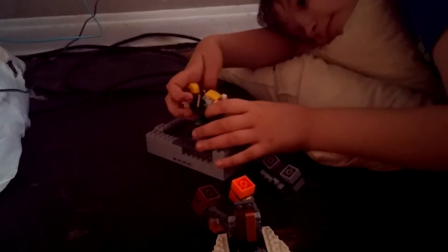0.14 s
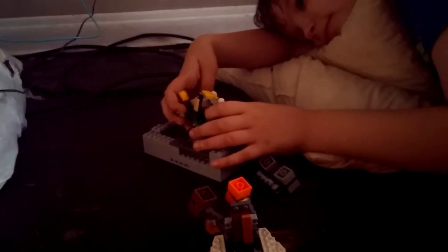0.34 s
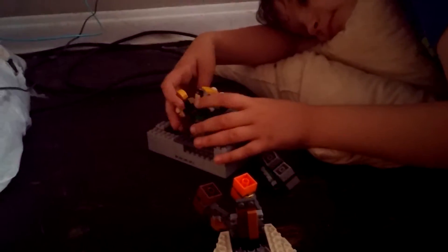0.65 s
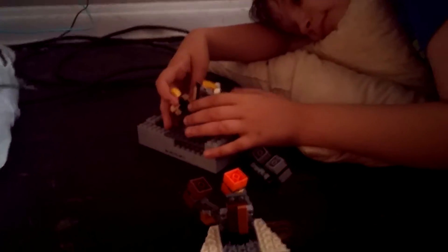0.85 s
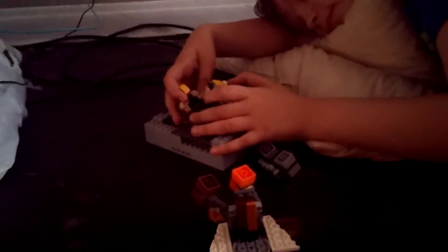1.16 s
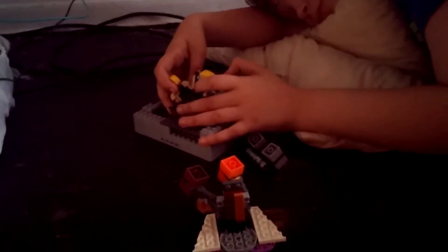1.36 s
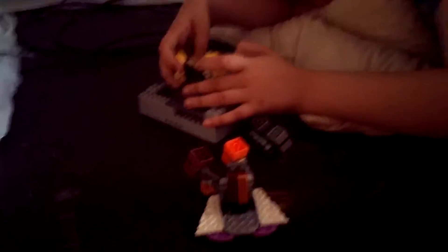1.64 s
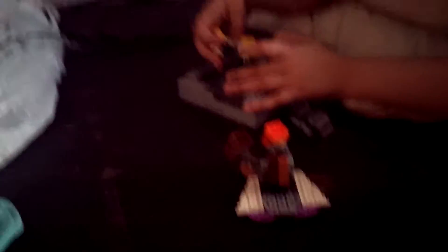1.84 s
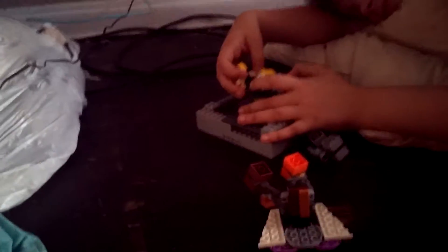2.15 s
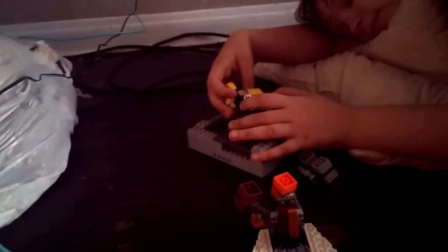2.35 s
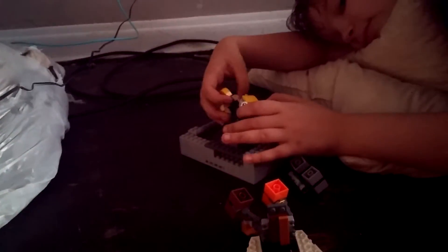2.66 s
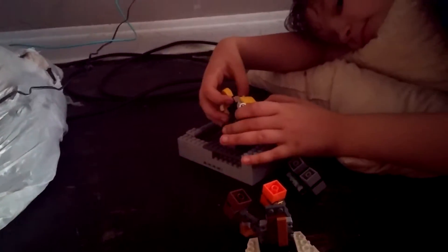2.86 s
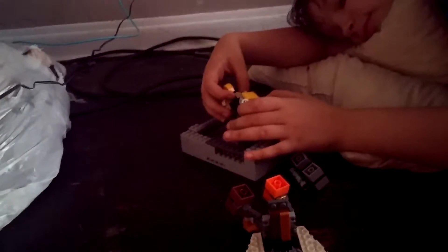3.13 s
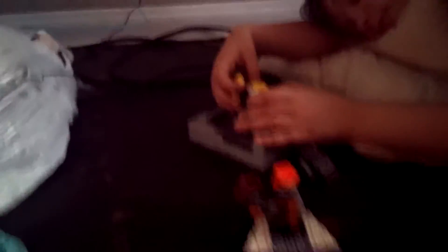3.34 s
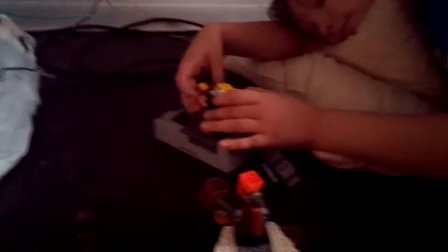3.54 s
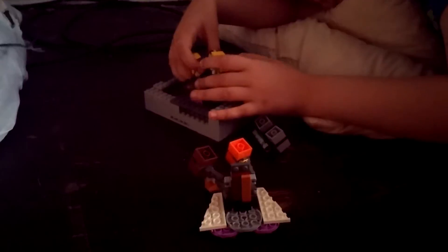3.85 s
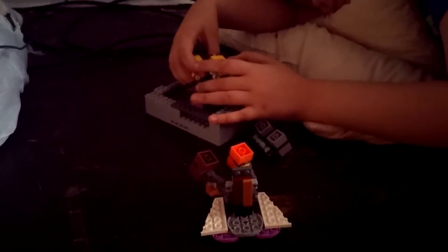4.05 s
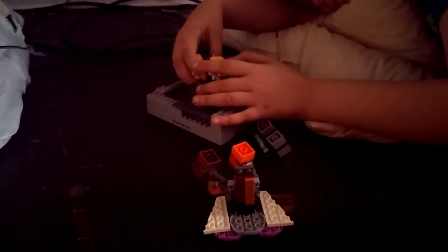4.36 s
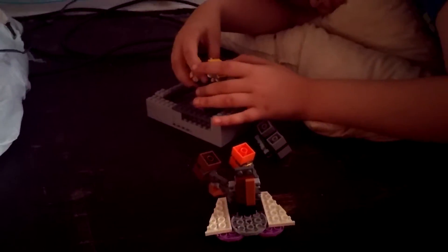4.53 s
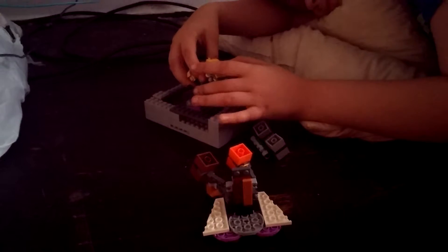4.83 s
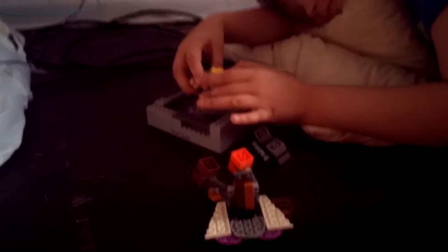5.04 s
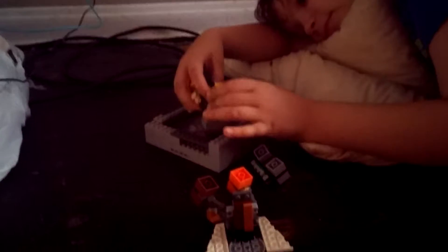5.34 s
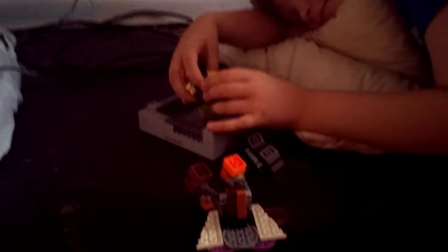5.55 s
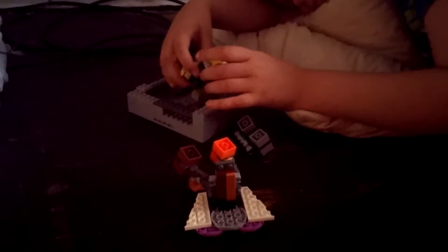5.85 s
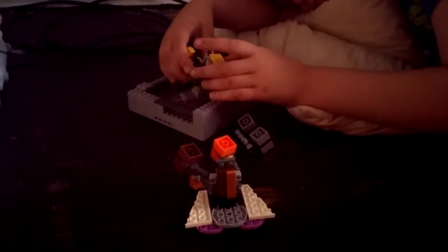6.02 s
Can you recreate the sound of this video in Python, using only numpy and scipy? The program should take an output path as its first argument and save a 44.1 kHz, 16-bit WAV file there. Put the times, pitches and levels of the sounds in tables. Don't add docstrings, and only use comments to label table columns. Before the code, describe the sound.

Small plastic bricks click, snap and clack in irregular bursts close by, with loud finger knocks on the microphone over a very faint low hum.

```python
import sys
import numpy as np
from scipy import signal
from scipy.fft import rfft, irfft, next_fast_len
from scipy.io import wavfile
from scipy.ndimage import uniform_filter1d, map_coordinates

SR = 44100
rng = np.random.default_rng(int(sys.argv[2]) if len(sys.argv) > 2 else 0)


def digitize_waveform(pressure):
    field = np.atleast_2d(pressure).T
    bounded = np.clip(field, -1, 1)
    quanta = np.round(bounded * 32767).astype(np.int16)
    wavfile.write(sys.argv[1], SR, quanta)


def invert_db(level):
    return 10 ** (np.asarray(level, dtype=float) / 20)


N = 272979

# pitch_hz, level_db, unsteadiness_db
HUM_LINES = [(59, -61.5, 0.5), (82.2, -53, 0), (113, -72.5, 2), (169.7, -70.5, 3), (226, -82.5, 1.5),
             (284, -77, 2), (333, -75.5, 0.5), (534, -92.5, 1)]
# freq_hz, density_db
DRONE_SPECTRUM = [(12, -45.5), (30, -6), (90, -3), (340, -13), (412, -25), (800, -27.5), (2000, -57.5),
                  (3000, -86)]
# time_s, level_db
DRONE_SWELL = [(0.0, -69.5), (0.58, -74.5), (1.29, -70.5), (1.57, -75.5), (2.33, -67.5), (3.26, -81),
               (3.53, -71), (3.98, -67), (4.14, -68), (4.86, -76.5), (5.84, -69), (6.19, -71)]
# freq_hz, likeness_0_1
DRONE_LIKENESS = [(60, 1), (290, 0.83), (640, 1), (1400, 0.64), (3000, .05)]
# freq_hz, density_db
AIR_SPECTRA = [
    [(4500, -21.5), (6000, -4), (8000, 12.5), (9200, 13.5), (10500, -4), (12000, 2.5), (15500, -0.5),
     (15900, -40)],
    [(4500, -23.5), (6000, -9), (8000, -0.5), (9800, 9), (11200, 2.5), (12500, -3), (15500, -5.5),
     (15900, -40.5)],
]
# freq_hz, density_db
MURK_SPECTRUM = [(600, -8), (1200, -2), (2000, -0.5), (3500, -3), (5500, -8.5), (7500, -23)]
# freq_hz, density_db
RUSTLE_SPECTRUM = [(250, -29.5), (450, -6.5), (800, 0.5), (1200, -7), (1800, -31.5)]
# time_s, whistle_hz
PORT_WHISTLE = [(0, 10190), (.88, 10200), (.99, 9960), (1.1, 10200), (1.8, 10250), (2.15, 10210),
                (2.4, 9700), (2.65, 9280), (2.95, 9480), (3.2, 9380), (3.5, 9550), (3.8, 9880),
                (4.1, 10250), (4.8, 10290), (5.15, 10250), (5.45, 10080), (5.75, 10230), (6.19, 10270)]
# time_s, level_db
IDLE_LEAK = [(0, -56), (.4, -60.5), (.6, -73), (1.1, -62), (1.85, -70.5), (2.04, -90), (2.2, -67.5),
             (2.35, -64), (2.42, -73.5), (2.8, -111), (3.2, -81), (3.42, -100), (4.1, -74.5), (4.5, -107),
             (4.9, -88.5), (5.07, -70), (5.68, -68.5), (6.19, -62)]
# time_s, level_db, squeak_0_1
RUB_STROKES = [
    [(3.485, -83, 0.93), (3.51, -48, 0.93), (3.525, -34, 0.84), (3.545, -62, 0.92), (3.58, -69, 0.6)],
    [(3.74, -56.5, 0.94), (3.80, -51.5, 0.75), (3.86, -59, 0.7), (3.90, -44, 0.58), (3.945, -32.5, 0.04),
     (4.005, -44.5, 0.2), (4.06, -43, 0), (4.12, -60.5, 0.1), (4.18, -53, 0)],
    [(4.545, -73, 1), (4.57, -42, 0.36), (4.605, -28, 0.11), (4.625, -36.5, 0.11), (4.65, -47, 0.26),
     (4.70, -52.5, 0.74), (4.75, -74.5, 0.7)],
]
# freq_hz, density_db
SKIN_SPECTRUM = [(130, -0.5), (300, -16.5), (900, -12), (2500, -5.5), (4000, -11), (9500, -14),
                 (13000, -20), (15600, -24), (15900, -72)]
# freq_hz, density_db
SQUEAK_SPECTRUM = [(4000, -70), (7000, -5), (9500, 2.5), (12000, -8), (15500, -18), (15900, -71)]
# time_s, level_db
PALM_ROLL = [(3.893, -71), (3.918, -38), (3.951, -40.5), (3.992, -53), (4.041, -49.5), (4.08, -77)]
# freq_hz, density_db
PALM_SPECTRUM = [(60, 4.5), (200, -1), (480, -3), (1000, -15), (2000, -26)]
# start_s, level_db
NAIL_TICKS = [(0.4418, -34), (1.0761, -28), (2.3045, -57.5), (3.8333, -33.5), (3.9435, -23.5), (4.05, -25),
              (4.417, -52.5), (4.1634, -21), (4.4378, -47), (4.4509, -40), (4.6, -19.5), (4.6065, -21),
              (4.62, -26), (4.639, -16.5), (4.642, -24), (4.668, -22.5), (4.6987, -38.5), (5.3548, -35)]
# freq_hz, density_db
NAIL_SPECTRUM = [(2500, -36), (5000, -18.5), (8000, 4), (12000, -2.5), (15900, -24)]
# start_s, level_db, pitch_hz, t60_s, rattle_db
CASE_BUMPS = [
    (1.617, -36.5, 96, 0.03, -56),
    (1.8623, -23.5, 124, 0.039, -13),
    (1.93, -28.5, 117, 0.021, -24.5),
    (2.299, -27.5, 115, 0.034, -16),
    (3.519, -18.5, 138, 0.016, -25),
    (3.812, -33.5, 148, 0.042, -13.5),
    (3.891, 1, 200, 0.0078, -4),
    (4.049, -15.5, 247, 0.018, 8),
    (5.71, -46, 105, 0.062, -46),
]
# centre_s, half_length_s, pitch_hz, level_db
CASE_CREAKS = [(3.52, 0.0042, 1086, -36.5), (3.532, 0.0041, 1020, -39), (3.5265, 0.0039, 2110, -31),
               (3.531, 0.0038, 2430, -40), (3.517, 0.0039, 2330, -52), (3.8, 0.0054, 1900, -48),
               (3.53, 0.0053, 588, -56), (3.8918, 0.0017, 600, -19), (3.912, .005, 550, -39),
               (3.92, .006, 430, -34.5), (3.929, .005, 530, -33.5), (3.934, .004, 700, -36.5),
               (4.0505, .002, 2500, -26.5), (3.813, 0.0036, 2200, -50.5)]
# centre_s, half_length_s, pitch_hz
BRIEF_TONES = [(1.867, .0035, 1090), (1.868, .002, 1900), (1.867, .002, 3100), (5.021, .007, 1380),
               (5.04, .008, 1400), (2.69, .015, 255), (5.109, .006, 270), (1.45, .012, 760),
               (3.526, .003, 2350), (5.522, .008, 1400), (5.572, .009, 1420), (3.783, .005, 1350),
               (2.302, .004, 1250), (2.303, .004, 2900)]
BRIEF_TONE_DB = [-39.5, -54, -52, -58, -68, -55.5, -49, -59, -45, -60, -64, -57, -55, -55]
# pitch_hz, level_db, t60_s
BRICK_MODES = [(1370, -19.5, 0.042), (1495, 5, 0.018), (1840, -1.5, 0.048), (2030, -0.5, 0.02),
               (2680, 4.5, 0.017), (2940, -4.5, 0.015), (4620, 4, .012)]
# freq_hz, density_db
SNAP_SPECTRUM = [(2500, -42), (4500, -5.5), (6000, 1), (8000, 7), (10500, -6.5), (13000, -12.5),
                 (15600, -28), (16100, -42.5)]
# freq_hz, density_db
CLACK_SPECTRUM = [(300, -50), (800, 6), (1200, -16.5), (1450, -2.5), (2200, -3.5), (3300, -4), (5000, -6.5),
                  (7500, -26.5)]
# share_of_pitch, density_db
CAVITY_SPECTRUM = [(0.701, -44.5), (0.879, -26), (0.96, 2.5), (1.04, -3), (1.128, -6.5), (1.398, -40.5)]
# start_s, snap_db, body_db, pitch_hz
BRICK_HITS = [(0.0008, -16.5, -30.5, 1840), (0.0148, -26, -27, 1660), (0.0168, -6.5, -23.5, 4700),
              (0.0424, -26, -31.5, 2600), (0.0608, -21.5, -27.5, 2000), (0.149, -26.5, -34.5, 1610),
              (0.19, -17, -26.5, 2645), (0.3458, -24.5, -30.5, 1905), (0.9248, -21.5, -29.5, 2570),
              (0.936, -22, -32, 4700), (0.9405, -29.5, -32.5, 2300), (0.9695, -38, -40, 1800),
              (1.1833, -13, -28, 1870), (1.1901, -14.5, -28.5, 1410), (1.2027, -28.5, -30, 1460),
              (1.3317, -24.5, -32, 1420), (1.3504, -8, -24.5, 2900), (1.3535, -19.5, -26.5, 3950),
              (1.4292, -23.5, -34, 3270), (1.4374, -40, -33, 3044), (1.9328, -32, -31.5, 1600),
              (1.9384, -22, -31, 3600), (2.1017, -11, -28.5, 3490), (2.1053, -16.5, -28.5, 2700),
              (2.1419, -15.5, -21, 2600), (2.4458, -24.5, -26.5, 4680), (2.4547, -10, -27, 3190),
              (2.4595, -20, -27, 2650), (2.4658, -11, -17.5, 3320), (4.0368, -25.5, -35, 3113),
              (5.0948, -24.5, -39, 1936), (5.098, -16.5, -29, 2030), (5.4244, -20.5, -31, 1710),
              (5.4479, -29.5, -34, 2270), (5.7326, -19, -33, 1580), (5.7475, -11, -25.5, 2610),
              (5.8635, -33.5, -33, 1970),
              (0.8577, -35, -56, 1860), (1.1194, -45.5, -53.5, 2720), (1.3235, -33.5, -43, 1440),
              (1.8183, -56, -67.5, 1550), (0.3536, -27.5, -42, 1840), (0.4433, -32.5, -41.5, 2820),
              (0.7459, -46, -45.5, 1940), (0.7511, -44, -62.5, 2000), (0.8738, -30, -39.5, 2020),
              (0.8892, -28.5, -41, 2000), (0.9029, -32.5, -34.5, 2030), (1.0659, -36, -49.5, 2000),
              (1.0993, -46.5, -49, 1840), (4.047, -33.5, -44.5, 2330), (1.2376, -29, -35.5, 2880),
              (1.898, -40.5, -44, 2480), (1.908, -37.5, -42, 3250), (2.07, -35, -96, 2570),
              (2.0833, -26, -41.5, 2640), (2.0942, -30.5, -33.5, 2820), (2.3003, -42, -42.5, 1760),
              (2.6733, -51, -43.5, 2780), (2.6877, -43.5, -47.5, 2600), (2.9217, -36, -48.5, 2730),
              (3.7783, -32.5, -49, 2680), (4.0105, -30, -37.5, 3270), (4.0272, -37, -33, 3060),
              (4.132, -30, -39.5, 2530), (4.2832, -45, -49, 2700), (4.3015, -39, -41, 2670),
              (4.31, -51.5, -54.5, 4400), (4.617, -28.5, -42.5, 1610), (5.4338, -56, -44.5, 1994),
              (5.5946, -27, -42.5, 1840), (5.7104, -29, -35.5, 1630), (6.0227, -27.5, -41.5, 1514)]
# start_s, snap_db, pitch_hz
EDGE_GRAZES = [(0.1055, -36.5, 1910), (0.1806, -29, 2600), (0.264, -26, 1900), (0.4391, -42, 2790),
               (0.8349, -39, 4620), (0.865, -32, 1970), (1.0396, -34, 2610), (1.5411, -45, 3040),
               (1.5539, -45, 3020), (1.7894, -49, 3360), (1.863, -32, 1095), (1.9104, -30, 3230),
               (2.0757, -29, 2350), (2.866, -41, 1500), (2.8966, -41.5, 1260), (3.085, -49.5, 1290),
               (3.5222, -47, 2300), (3.6833, -52.5, 1264), (3.7452, -48, 2470), (3.76, -47, 2610),
               (3.788, -35.5, 2580), (4.4346, -51, 1397), (5.015, -47, 1366), (5.0752, -50, 1460),
               (5.2875, -40, 1370), (5.3322, -36.5, 4720), (5.5191, -35, 1450), (5.5801, -41.5, 1380),
               (5.8575, -49, 1900), (5.917, -33, 3420), (5.9592, -38.5, 4360), (6.1472, -33, 1840)]
# time_s, body_left_right_db
BRICK_AIM = [(0, -12), (.45, -3), (.88, -5), (1.2, -10.5), (1.93, -8.5), (2.1, -9.5), (2.46, -8), (2.8, -7),
             (4, -19.5), (4.7, -8), (5.4, -7.5), (6.19, -9.5)]
# start_s, end_s, level_db, from_hz, to_hz
STUD_SCRAPES = [(0.018, 0.052, -32, 1832, 1760), (0.088, 0.116, -44, 2042, 1940),
                (0.942, 0.954, -42, 4700, 4600), (0.041, 0.094, -30, 1974, 1872),
                (0.15, 0.195, -43.5, 1646, 1920), (0.198, 0.238, -37.5, 1340, 1284),
                (0.851, 0.919, -55, 1870, 1990), (1.068, 1.15, -57, 1920, 1900),
                (1.205, 1.26, -45.5, 1776, 1530), (1.311, 1.358, -51, 2785, 2450),
                (2.108, 2.146, -37.5, 2927, 2940), (2.164, 2.167, -25.5, 1840, 1840),
                (4.02, 4.046, -43.5, 3064, 3064), (4.288, 4.306, -59, 2760, 3270),
                (4.3, 4.322, -52, 4570, 4100), (5.102, 5.15, -42, 1976, 2160),
                (5.738, 5.838, -47.5, 1945, 1635), (5.866, 5.946, -47.5, 1949, 1875),
                (5.718, 5.74, -46, 1630, 1510)]

CONTACT_T = np.arange(5760) / SR


def unit(x):
    return x / np.sqrt(np.mean(x ** 2) + 1e-20)


def along(points, hz):
    f, v = np.transpose(points)
    return np.interp(np.log(hz + 1), np.log(f + 1), v)


def curves(rows):
    s, *cols = np.transpose(rows)
    return [np.interp(np.arange(N) / SR, s, c) for c in cols]


def wobble(rate_hz):
    knots = rng.standard_normal(int(N * rate_hz / SR) + 4)
    return map_coordinates(knots, [np.arange(N) * rate_hz / SR])


def noise(spectrum, size, channels):
    m = next_fast_len(size, True)
    white = rfft(rng.standard_normal((channels, m)))
    gain = invert_db(along(spectrum, np.fft.rfftfreq(m, 1 / SR)))
    return unit(irfft(white * gain, m)[:, :size])


def mono(spectrum, size):
    return noise(spectrum, size, channels=1)[0]


def add(track, start_s, sound):
    part = track[..., round(start_s * SR):][..., :sound.shape[-1]]
    part += sound[..., :part.shape[-1]]


def decay(t, t60_s):
    return invert_db(-60 * t / t60_s)


def onset(t, rise_s):
    return 1 - np.exp(-t / rise_s)


def ring(hz, t60_s, t, attack_s):
    return np.sin(2 * np.pi * hz * t) * decay(t, t60_s) * onset(t, attack_s)


def glide(flutter, hz):
    turns = np.cumsum(hz) / SR
    return (flutter * np.exp(2j * np.pi * turns)).real


def ports(left_db, right_db):
    return invert_db([[left_db], [right_db]])


def appliance():
    t = np.arange(N) / SR
    lines = 0
    for hz, db, shake_db in HUM_LINES:
        level = invert_db(db + 2.0 + shake_db * wobble(1.7))
        lines = lines + level * np.sin(2 * np.pi * hz * t + 0.43 * wobble(4.0))
    likeness = along(DRONE_LIKENESS, np.fft.rfftfreq(N, 1 / SR))
    angle = np.arccos(np.clip(likeness, -1, 1)) / 2
    parts = rfft(noise(DRONE_SPECTRUM, size=N, channels=2))
    mid, side = irfft(parts * [np.cos(angle), np.sin(angle)], N)
    drone = invert_db(curves(DRONE_SWELL)[0] + 11.5 + 1.2 * wobble(5)) * np.array([mid + side, mid - side])
    return (lines + drone) * ports(-2.2, 1.8)


def suppressor(clatter):
    window = max(round(.006 * SR), 1)
    power = np.abs(uniform_filter1d(clatter ** 2, size=window, origin=window // 3))
    heard_db = 10 * np.log10(power + 1e-14)
    wanted_db = np.minimum(-41 + 0.45 * heard_db, heard_db - 8)
    ramp_db = 201 * np.arange(N) / SR
    return np.maximum(np.maximum.accumulate(wanted_db + ramp_db) - ramp_db, curves(IDLE_LEAK)[0])


def patchy(x, depth_db):
    z = signal.stft(x, nperseg=512)[2]
    field = uniform_filter1d(rng.standard_normal(z.shape), size=9, axis=1)
    field = uniform_filter1d(field, size=7, axis=2)
    return signal.istft(z * invert_db(depth_db * unit(field)), nperseg=512)[1][:, :N]


def hiss(gate_db):
    air = np.vstack([mono(spectrum, N) for spectrum in AIR_SPECTRA])
    air = patchy(air, depth_db=4.0) * ports(7, 11)
    flutter = .5 + wobble(210) + 1j * wobble(210)
    whistle = glide(flutter, curves(PORT_WHISTLE)[0] + 14 * wobble(12))
    whistle *= invert_db(10.5 - 0.25 * np.maximum(gate_db + 64, -8))
    treble = invert_db(gate_db + 0.24 * wobble(18)) * (air + whistle * [[0], [1]])
    stirring_db = 2.5 * wobble(20)
    middle = patchy(noise(MURK_SPECTRUM, size=N, channels=2), depth_db=5) * ports(-1.5, 3)
    middle *= invert_db(-81.5 + 1.57 * (gate_db + 70.0) + stirring_db)
    low = invert_db(-83.5 + 0.6 * (gate_db + 73.5) + stirring_db) * noise(RUSTLE_SPECTRUM, size=N, channels=2)
    floor = invert_db(-89.0) * noise(MURK_SPECTRUM, size=N, channels=2)
    return treble + middle + low + floor


def rubs():
    out = np.zeros(N)
    grain = invert_db(2.5 * wobble(300) + 1.5 * wobble(60))
    rough = unit(grain * mono(SKIN_SPECTRUM, N))
    thin = mono(SQUEAK_SPECTRUM, N)
    for stroke in RUB_STROKES:
        before, after = (stroke[0][0] - .01, -130, 0), (stroke[-1][0] + 0.012, -130, 0)
        level_db, squeak = curves([before, *stroke, after])
        share = np.clip(squeak, 0, 1)
        out += invert_db(level_db) * ((1 - share) * rough + share * thin)
    palm_db = curves([(3.8, -130), *PALM_ROLL, (4.15, -130)])[0]
    return out + invert_db(palm_db) * unit(grain * mono(PALM_SPECTRUM, N))


def knocks():
    out, t = np.zeros(N), np.arange(SR // 8) / SR
    for s, db in NAIL_TICKS:
        tick = mono(NAIL_SPECTRUM, len(t)) * decay(t, 0.0013) * onset(t, 0.00031)
        add(out, s - .0003, invert_db(db + 10.5) * tick)
    for s, db, hz, t60_s, rattle_db in CASE_BUMPS:
        rattle_hz = 298 + 2.29 * hz
        rattle = ring(rattle_hz, 0.0055, t, 0.00053) + 0.86 * ring(rattle_hz, 0.012, t, 0.0091)
        add(out, s, -invert_db(db + 12.5) * ring(hz, t60_s, t, 0.0058))
        add(out, s, -invert_db(rattle_db - 15.0) * rattle)
    brief_tones = [(*row, db) for row, db in zip(BRIEF_TONES, BRIEF_TONE_DB)]
    from_centre_s = t - 1 / 25
    for s, half_s, hz, db in CASE_CREAKS + brief_tones:
        swell = np.exp(-(from_centre_s / half_s) ** 2)
        add(out, s - 1 / 25, -invert_db(db) * swell * np.cos(2 * np.pi * hz * from_centre_s))
    return out


def fingers():
    return (rubs() + knocks()) * ports(-34, 5)


def bearing_db(s):
    return np.interp(s, *np.transpose(BRICK_AIM))


def scrapes():
    out = np.zeros((2, N))
    for s, end_s, db, from_hz, to_hz in STUD_SCRAPES:
        t = np.arange(round((end_s - s) * SR)) / SR
        knots = rng.standard_normal((2, 2, 60))
        slips = [[map_coordinates(part, [t * 560]) for part in port] for port in knots]
        flutter = np.array([0.4 + re + 1j * im for re, im in slips])
        edges = np.minimum(1, np.minimum(t, t[::-1] / 2) / 0.0023)
        stroke = edges * invert_db(-14.5 * t / t[-1])
        tone = glide(flutter, np.linspace(from_hz, to_hz, len(t)))
        add(out, s, invert_db(db - 1.5) * ports(0, -bearing_db(s)) * stroke * tone)
    return out


def fading(t, t60_s, cut_s):
    return invert_db(-60 * t / t60_s - 20 * (t / cut_s) ** 3) * onset(t, 0.00065)


def room(t60_s, cut_s):
    t = np.arange(SR // 8) / SR
    tail = rng.standard_normal((2, len(t))) * fading(t, t60_s, cut_s)
    return tail / np.linalg.norm(tail[0])


def brick_snap(snap_db, crack, settle):
    t = CONTACT_T
    envelope = crack + invert_db(-13.5) * settle * fading(t, 0.24, 0.15)
    snap = invert_db(snap_db - 8.5) * noise(SNAP_SPECTRUM, size=len(t), channels=2) * envelope
    ping = invert_db(snap_db - 6) * ring(8070 * rng.normal(1, 0.024), 0.012, t, 0.00068)
    spike_db = -1 + 1.6 * snap_db
    ping += invert_db(spike_db) * decay(t, .0035) * onset(t, .0004) * mono(NAIL_SPECTRUM, len(t))
    return snap + [np.roll(ping, 2), ping]


def brick_clack(body_db, hz, crack, settle):
    t = CONTACT_T
    spread_db = np.clip(0.39 * (body_db + 28.5), -11, 0)
    pocket = [(share * hz, db) for share, db in CAVITY_SPECTRUM]
    mix = invert_db(spread_db - 3.5) * noise(CLACK_SPECTRUM, size=len(t), channels=2)
    mix += invert_db(-11) * noise(pocket, size=len(t), channels=2)
    return invert_db(body_db - 2.5) * mix * (crack + invert_db(-8.5) * settle * fading(t, 0.097, 0.024))


def brick_ring(body_db, hz):
    t = CONTACT_T[:2600]
    out = np.zeros(len(CONTACT_T))
    for mode_hz, db, t60_s in [*BRICK_MODES, (hz, -2, 36 / hz)]:
        octaves = abs(np.log2(mode_hz / hz))
        level = invert_db(db - 4.0 - 8 * octaves + rng.normal(0, 2.0))
        out[:len(t)] += level * ring(mode_hz * rng.normal(1, 0.018), t60_s, t, 0.00014)
    return invert_db(body_db - 7.5) * out


def contacts():
    grazes = [(s, db, db - 18, hz) for s, db, hz in EDGE_GRAZES]
    return sorted(BRICK_HITS + grazes)


def bricks():
    out, t = np.zeros((2, N)), CONTACT_T
    early, late = [signal.butter(6, hz, "highpass", fs=SR, output="sos") for hz in (1235, 1620)]
    chatter = invert_db(3 * wobble(400))
    for s, snap_db, body_db, hz in contacts():
        bass_cut = late if s > 4.9 else early
        pan_db = bearing_db(s)
        settle = np.resize(chatter[round(s * SR):], len(t))
        rise_s = 0.0024 - 1.33 * max(-21.5 - snap_db, 0)
        crack = 1.08 * decay(t, 0.015) * (1.5 - np.exp(-t / rise_s))
        snap = brick_snap(snap_db, crack, settle)
        clack = signal.sosfilt(bass_cut, brick_clack(body_db, hz, crack, settle))
        body = signal.sosfilt(bass_cut, brick_ring(body_db, hz))
        thud = invert_db(body_db - 20.0) * ring(rng.uniform(180, 290), 0.093, t, 0.0016)
        direct = snap * ports(0, 1.5) + (clack + body) * ports(0, -pan_db) + thud * ports(0, 4)
        add(out, max(s - .0008, 0), direct)
        sent = (1.3 * body + 1.166 * clack[0])[None, :900]
        echo = signal.fftconvolve(sent, room(.18, .095), axes=1)
        add(out, s, invert_db(1.0) * echo * ports(0, -.7 * pan_db))
    return out


def scene():
    room_tone, hand = appliance(), fingers()
    clatter = scrapes() + bricks()
    return room_tone + hiss(suppressor(clatter[0])) + hand + clatter


def roll_off(x):
    return signal.sosfilt(signal.butter(12, 16470, fs=SR, output="sos"), x)


def record(dry):
    m = next_fast_len(N, True)
    f = np.fft.rfftfreq(m, 1 / SR)

    def peak(centre_hz, width_hz, db):
        damping = 1j * f * width_hz
        return 1 + invert_db(db) * damping / (centre_hz ** 2 - f ** 2 + damping)

    lifts = np.array([peak(8000, 1100, -5.0), peak(9900, 1300, -6.5)])
    band = (f < 15900) * 1j * f / (35 + 1j * f)
    heard = irfft(rfft(dry, m) * lifts * band, m)[:, :N]
    return roll_off(heard)


dry = scene()
out = record(dry)
digitize_waveform(out)
```